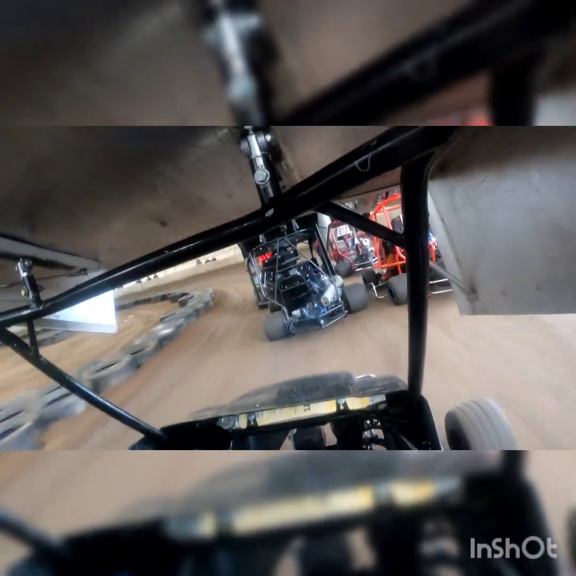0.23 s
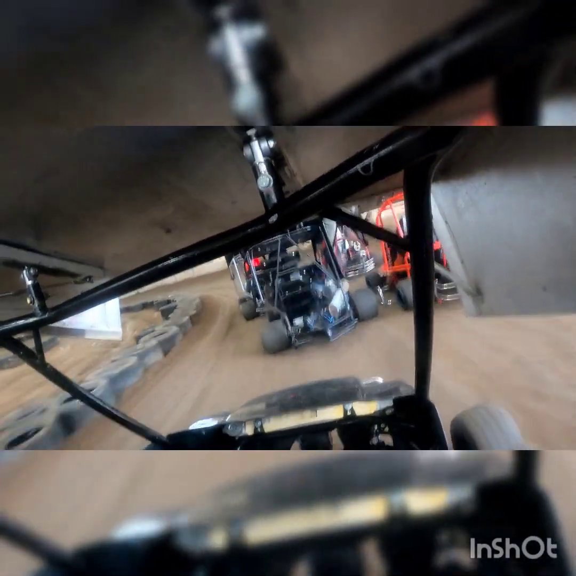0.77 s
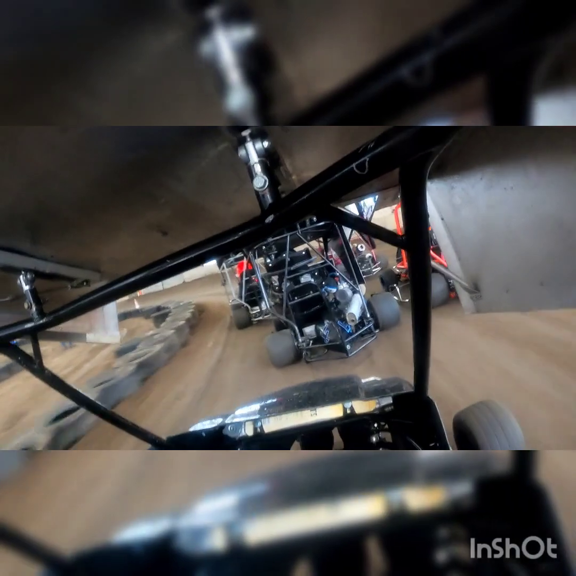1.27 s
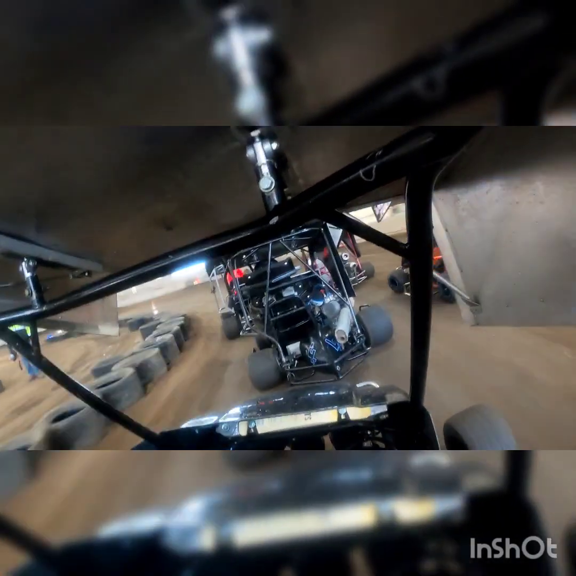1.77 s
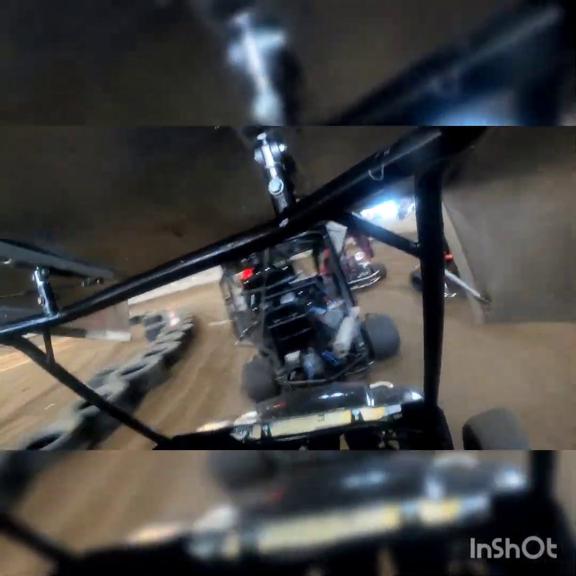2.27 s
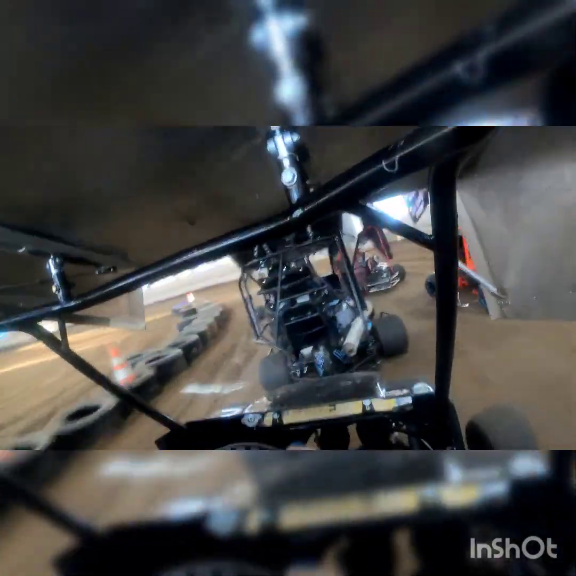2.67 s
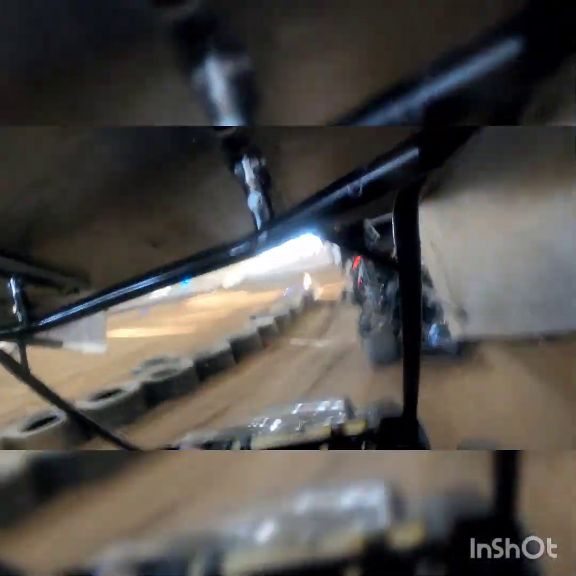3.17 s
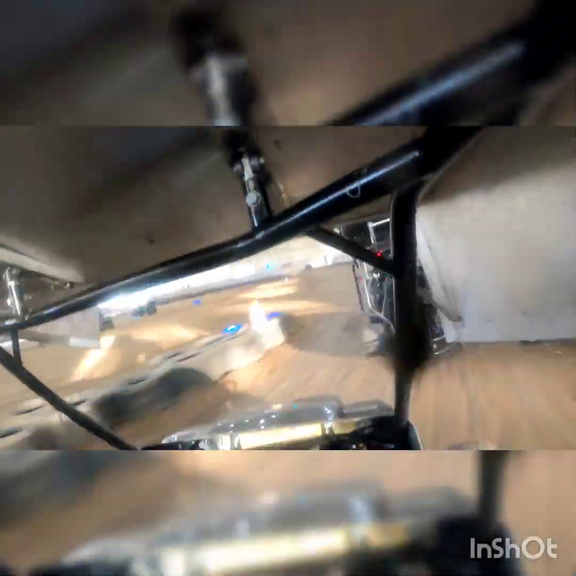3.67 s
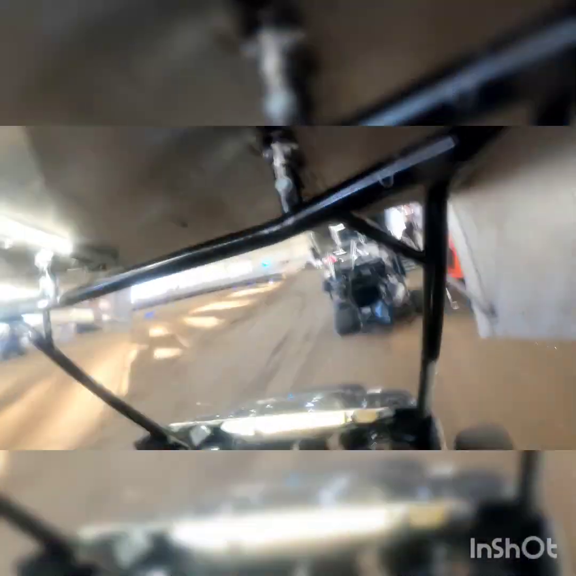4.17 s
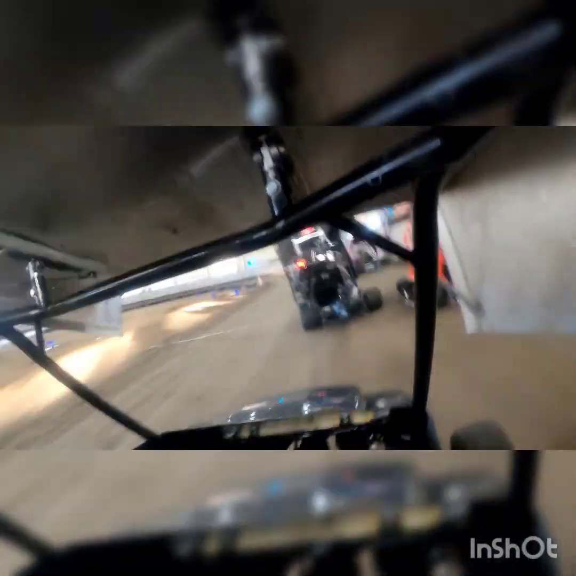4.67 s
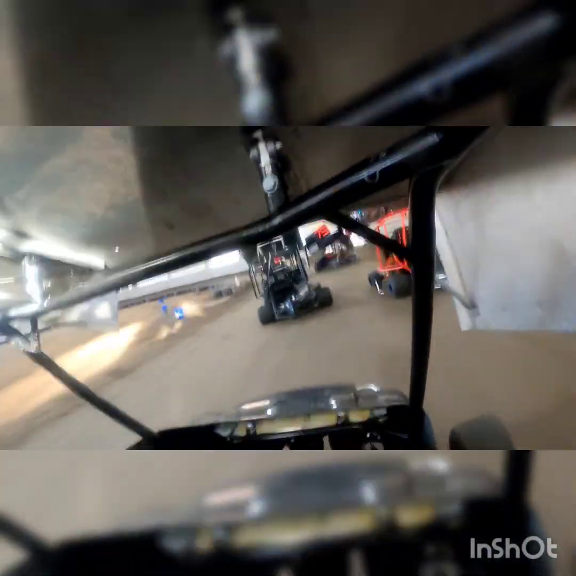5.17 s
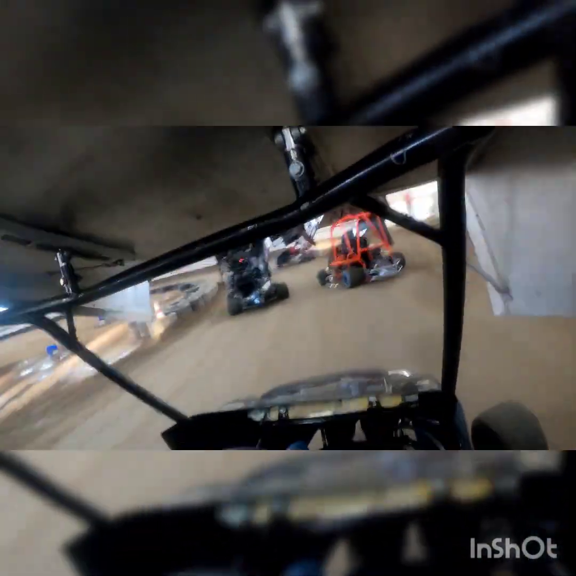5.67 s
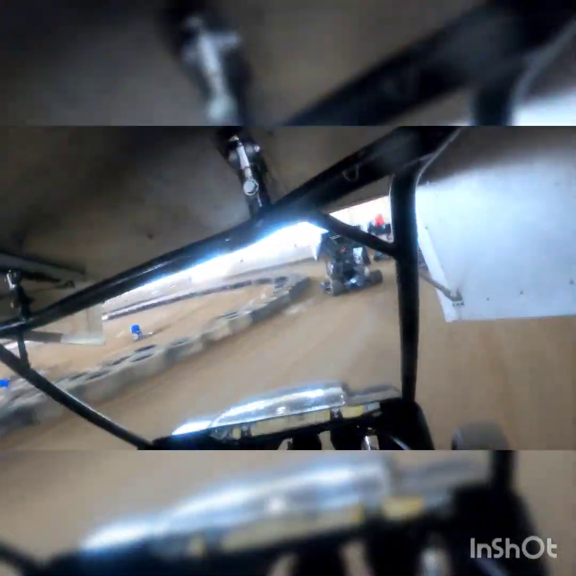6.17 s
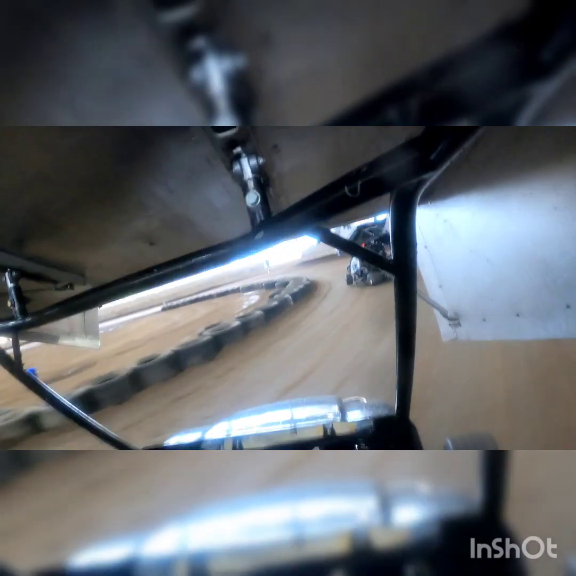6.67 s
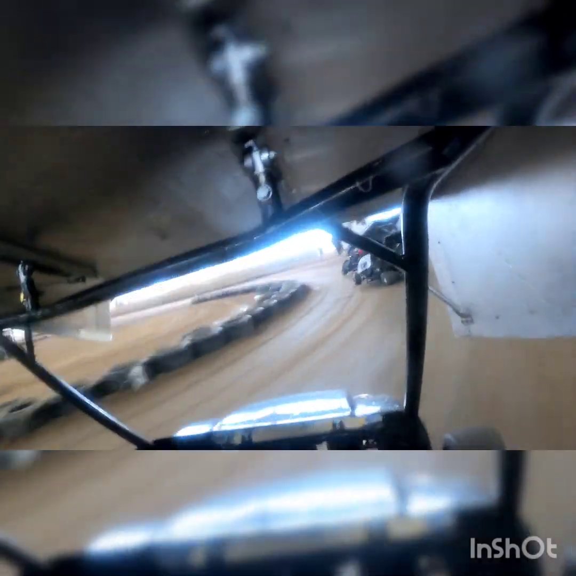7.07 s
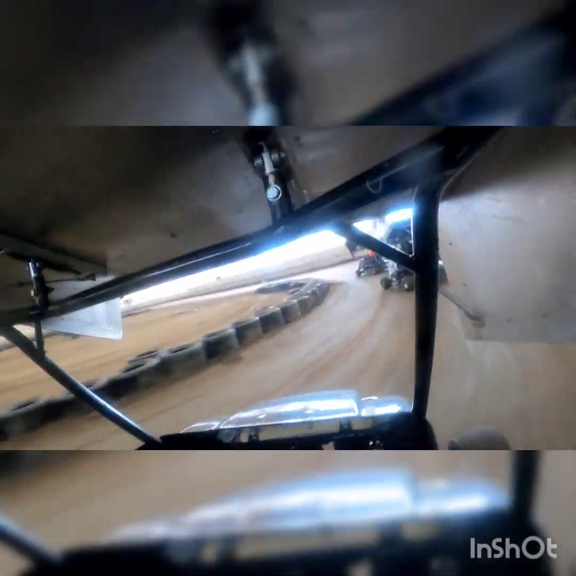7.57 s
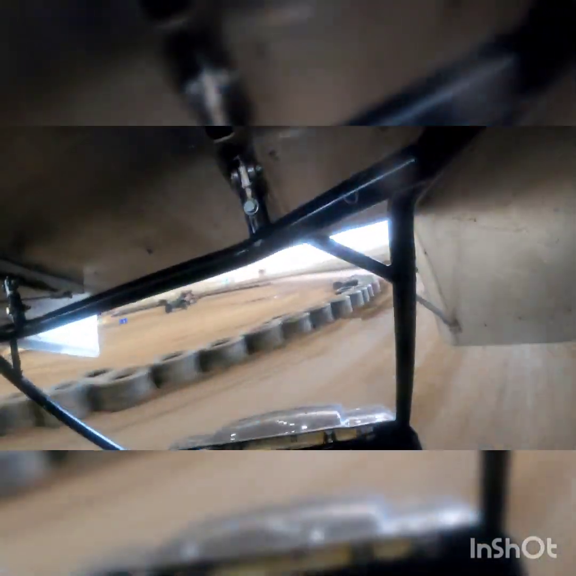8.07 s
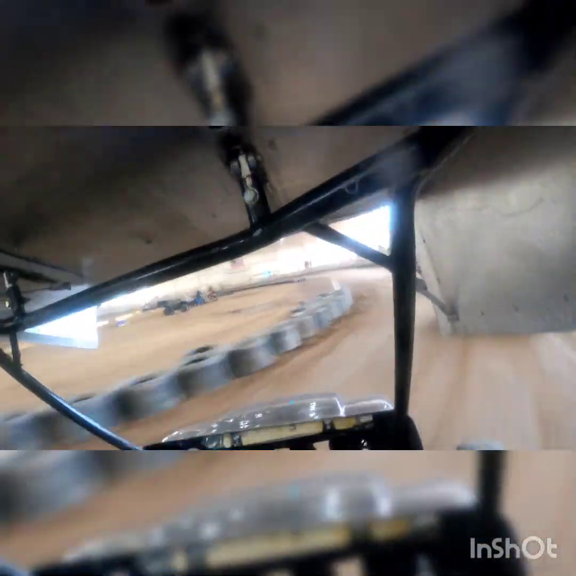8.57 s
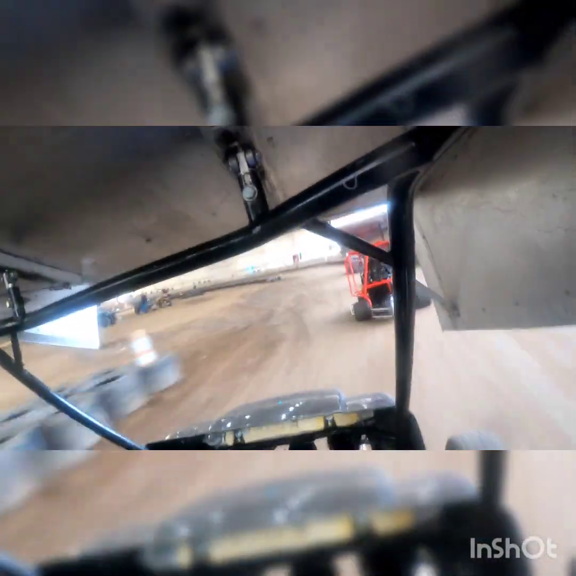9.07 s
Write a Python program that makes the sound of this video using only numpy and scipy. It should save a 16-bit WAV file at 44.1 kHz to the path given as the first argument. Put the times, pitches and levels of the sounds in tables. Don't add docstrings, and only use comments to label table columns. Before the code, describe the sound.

A close, continuous kart roar, coloured by a small camera housing, pulses and trembles with bumps. The engine starts low and uneven with another kart blipping alongside, then pulls harder from about three seconds. Stones tick, cage tubes ring dully, tyres rumble over ruts, and a cluster of slams chokes the sound near six seconds before a stronger, higher finish.

```python
import sys
import numpy as np
from scipy import signal
from scipy.fft import rfft, irfft, next_fast_len
from scipy.io import wavfile
from scipy.ndimage import map_coordinates

SR = 44100
rng = np.random.default_rng(int(sys.argv[2]) if len(sys.argv) > 2 else 0)


def decibels_to_gain(level_db):
    exponent = np.asarray(level_db, float) / 20
    return 10 ** exponent


def master(y):
    cut = np.clip(np.atleast_2d(y).T, -1, 1)
    pcm = np.round(cut * 32767)
    wavfile.write(sys.argv[1], SR, pcm.astype(np.int16))


N = 410998

# (time [s], firing rate [Hz], effort [dB])
THROTTLE = [(0.0, 60, -0.5), (0.75, 85, -2.5), (1.11, 83, -1.5), (1.35, 70, -2), (1.62, 69, -3),
            (1.9, 86, -1), (2.18, 67, -1.5), (2.5, 70, -0.5), (3.03, 92, -1), (3.2, 118, 2.5),
            (4.85, 116, 1), (5.03, 101, 0), (5.5, 99, 0.5), (5.75, 66, 1), (6.22, 110, 1),
            (7.5, 89.24, 1.5), (8.0, 131, 3), (9.32, 143, 2.5)]
# (time [s], rate swing [Hz], first order level [dB], second order level [dB])
BARKS = [(0.02, 0, -21, -18), (0.3, 2, -30, -18.5), (1.11, 1.5, -18.5, -12.5), (1.9, 1, -19, -11),
         (2.661, 7, -25.5, -20.5), (3.06, 1, -15, -13.5), (3.43, -13, -29.5, -18.5), (3.58, 5, -15, -38),
         (3.74, -7, -35, -21.5), (3.84, 4, -20.5, -27), (4.12, 7, -13.5, -35), (4.31, -11, -17, -36),
         (4.571, 2, -17.5, -20.5), (4.88, 1, -19, -27.5), (5.351, -2, -26.5, -16), (5.53, 1, -18.5, -16.5),
         (6.27, 9, -14, -19), (6.44, -4.5, -25.5, -11), (6.57, 5, -12.5, -26), (6.74, -11, -22.5, -15.5),
         (6.94, 28, -14, -23), (7.08, 17, -17.5, -22.5), (7.65, 8, -13, -20.5), (7.79, 11, -14.5, -25.5),
         (8.079, 11, -24, -18), (8.25, -18.5, -21.5, -30), (8.58, 16, -19.5, -18), (8.73, 6.5, -12.5, -38),
         (9.018, 11, -16.5, -20), (9.17, -0.5, -11.5, -35)]
BARK_HALF_S = 0.08


def unit(x):
    return x / np.sqrt(np.mean(x ** 2) + 1e-20)


def along(points, hz):
    f, value = np.transpose(points)
    return np.interp(np.log(hz + 1), np.log(f + 1), value)


def curves(rows):
    s, *columns = np.transpose(rows)
    return [np.interp(np.arange(N) / SR, s, column) for column in columns]


def wobble(rate):
    coarse = np.arange(0, N + 16, 16)
    knots = rng.standard_normal(int(N * rate / SR) + 4)
    return np.interp(np.arange(N), coarse, map_coordinates(knots, [coarse * rate / SR]))


def filtered(x, response):
    m = next_fast_len(N + SR // 2)
    return irfft(rfft(x, m) * response(np.fft.rfftfreq(m, 1 / SR)), m)[..., :N]


def below(x, hz):
    return filtered(x, lambda f: 1 / (1 + (f / np.reshape(hz, (-1, 1, 1))) ** 6))


def tone(hz, db, drift_hz, flutter_db):
    phase = 2 * np.pi * np.cumsum(hz + drift_hz * wobble(25)) / SR
    return np.sqrt(2) * decibels_to_gain(db + flutter_db * wobble(30)) * np.sin(phase)


def humps(s, half_s, size):
    t = np.arange(0, N + 64, 64) / SR
    bells = np.exp(-((t[:, None] - s) / half_s) ** 2) @ (size * np.ones(len(s)))
    return np.interp(np.arange(N) / SR, t, bells)


def swells(s, half_s, db, rest_db):
    return 20 * np.log10(humps(s, half_s, decibels_to_gain(db)) + decibels_to_gain(rest_db))


def rung(rows, rest_db):
    s, half_s, db, hz = np.transpose(rows)
    return np.interp(np.arange(N) / SR, s, hz), swells(s, half_s, db - 3.0, rest_db)


def firing_rate():
    s, swing_hz = np.transpose(BARKS)[:2]
    return curves(THROTTLE)[0] + humps(s, BARK_HALF_S, swing_hz)


def engine():
    pipe_hz, pipe_width_hz, pipe_db = 295, 29.4, -31
    hz = firing_rate()
    s, _, first_db, second_db = np.transpose(BARKS)
    first_db = swells(s, BARK_HALF_S, first_db, rest_db=-25)
    second_db = swells(s, BARK_HALF_S, second_db, rest_db=-28.5)
    exhaust = tone(hz, first_db - 2.5, drift_hz=1.5, flutter_db=1.3)
    exhaust += tone(2 * hz, second_db - 4.5, drift_hz=3.1, flutter_db=1.3)
    for order in (3, 4, 5):
        off = (order * hz - pipe_hz) / pipe_width_hz
        exhaust += tone(order * hz, pipe_db - 10 * np.log10(1 + off ** 4), drift_hz=5, flutter_db=3.5)
    return exhaust


def ports(pair):
    # (frequency [Hz], density [dB per Hz])
    left_duct = [(190, -31), (330, -5), (499, 2.5), (661, -3), (807, -0.5), (1190, 0), (1300, -5.5),
                 (1730, -3.5), (2510, -11.5), (2830, -30.5), (3110, -15), (4000, -26.5), (4630, -18.5),
                 (5510, -17), (8010, -44.5), (10400, -76), (17600, -120)]
    right_duct = [(190, -20), (330, -6.5), (455, -1), (626, -11), (765, 1.5), (874, -8.5), (1170, 0),
                  (1380, -8.5), (1620, -3), (2510, -10.5), (2790, -19), (3060, -17.5), (4060, -21),
                  (4450, -27), (8010, -37.5), (10400, -71), (17600, -120)]
    # (frequency [Hz], width [Hz], lift [dB])
    resonances = [(1177, 65, 1), (1583, 110, 2), (2524, 53, 3.5), (3050, 64, 5), (4390, 120, 10.5),
                  (4700, 80, 5)]
    # (frequency [Hz], correlation [0 to 1])
    likeness = [(250, 1), (390, 1), (500, .74), (640, 0.089), (900, 0.55), (1170, 0.89), (1480, 0.98),
                (1700, 0.9), (2100, 0.68), (2450, .93), (3100, 0.63), (4100, 0.66), (4500, 0.87),
                (5400, 0.56), (6200, .15)]
    # (frequency [Hz], phase [rad])
    left_lead = [(0, -9.5), (520, -1.15), (1030, 0.5), (1460, -0.85), (1980, 0.33), (2410, 1.5),
                 (3450, 0.07), (4570, 3.5), (4910, 4.5), (5600, 4.5), (6290, -3.5), (6890, -1.5),
                 (7150, -14.5), (7750, 2)]

    def response(f):
        turn = np.arccos(np.clip(along(likeness, f), 0, 1)) / 2
        lift_db = sum(db / (1 + ((f - c) / w) ** 2) for c, w, db in resonances)
        left_close_db = 5 / (1 + (5750 / (f + 1)) ** 40)
        right_close_db = 14 / (1 + (8100 / (f + 1)) ** 60)
        lead = np.exp(.5j * along(left_lead, f))
        left = decibels_to_gain(along(left_duct, f) + lift_db - 3.5 - left_close_db) * lead
        right = decibels_to_gain(along(right_duct, f) + lift_db - right_close_db) * np.conj(lead)
        return np.array([[left * np.cos(turn), left * np.sin(turn)],
                         [right * np.cos(turn), -right * np.sin(turn)]])
    return unit(filtered(pair, response).sum(axis=1))


def pack_chains(rattle, pack_db):
    def whine(f):
        peak_db = 0.91 * pack_db / (1 + ((f - 5000) / 450) ** 4)
        dip_db = 1.1 * pack_db / (1 + ((f - 4050) / 250) ** 2)
        return decibels_to_gain(peak_db - dip_db) - 1
    return filtered(rattle, whine)


def roar():
    # (time [s], half length [s], change [dB])
    tin_swells = [
        (0.311, .03, -8),
        (0.836, 0.03, 2.5),
        (1.1, 0.068, 3),
        (1.5, 0.072, 1.5),
        (1.66, 0.046, -3.5),
        (2.604, 0.058, 4.5),
        (6.49, .06, -4),
        (8.24, 0.12, -2),
        (8.636, 0.13, 2.5),
    ]
    # (frequency [Hz], density [dB per Hz])
    air_colour = [(7600, -22), (8500, -1.5), (10300, 0), (12200, -1.5), (13500, -10.5), (15000, -25),
                  (16000, -56.5)]
    pack_full_db, pack_leaves_s, pack_fade_s = 2.5, 3.2, .6

    t = np.arange(N) / SR
    effort_db = curves(THROTTLE)[1]
    tin_db = humps(*np.transpose(tin_swells))
    pack = np.clip((pack_leaves_s - t) / pack_fade_s, 0, 1)
    pack_db = pack_full_db * pack

    level_db = -23 + .1 * effort_db + tin_db
    drone_db = 0.44 - 0.37 * effort_db + 0.23 * pack_db - .9 * tin_db
    bite_db = 0.01 + 1.18 * effort_db - 0.79 * tin_db
    fizz_db = -1.7 + 0.48 * effort_db + pack_db - .8 * tin_db

    firing = np.cos(2 * np.pi * np.cumsum(firing_rate()) / SR)
    grain = decibels_to_gain(0.83 * wobble(80) + 1.02 * wobble(400)) * (1 + 0.14 * firing)
    rattle = ports(grain * rng.standard_normal((2, N)))
    low, middle, upper = below(rattle, hz=[680, 1500, 4100])
    chains = pack * pack_chains(rattle, pack_full_db)

    lurch_db = 0.56 * wobble(9.9) + 0.6 * wobble(22) + 0.98 * wobble(50)
    spit = decibels_to_gain(fizz_db + 0.88 * lurch_db + 0.9 * wobble(11) + 1.2 * wobble(150))
    sound = decibels_to_gain(drone_db + 1.2 * wobble(15)) * low
    sound += decibels_to_gain(0.18 * lurch_db) * (middle - low)
    sound += decibels_to_gain(bite_db + lurch_db + 0.76 * wobble(11)) * (upper - middle)
    sound += spit * (rattle - upper + chains)

    hiss = unit(filtered(rng.standard_normal((2, N)), lambda f: decibels_to_gain(along(air_colour, f))))
    hiss_db = -46.5 + .5 * effort_db - 0.34 * pack_db
    hiss_db += .3 * lurch_db + .8 * wobble(9) + 2.2 * wobble(300)
    return decibels_to_gain(level_db + 4.5) * (sound + decibels_to_gain(hiss_db) * spit * hiss)


def mount():
    # (time [s], half length [s], level [dB], pitch [Hz])
    bumps = [(.06, 0.12, -13, 41.78), (.4, .1, -16, 42.13), (.61, 0.044, -16, 44.5),
             (.85, .2, -16.5, 42.86), (1.4, 0.27, -14.5, 41.05), (1.73, .08, -14.5, 46.1),
             (2.05, 0.22, -20, 46.7), (2.42, 0.26, -18, 43.9), (2.9, 0.085, -12.5, 40.48),
             (3.15, .12, -16, 39.4), (3.5, .25, -19.5, 39), (3.9, 0.059, -16, 40.83),
             (4.13, .1, -17.5, 41.2), (4.55, 0.24, -16.5, 40.56), (4.9, .15, -21, 42.46),
             (5.14, .05, -14, 40.3), (5.3, .1, -16, 42.7), (5.8, 0.19, -15.5, 41.54),
             (6.07, 0.12, -14.5, 40.8), (6.39, 0.051, -12.5, 45.1), (6.82, 0.13, -18, 42.83),
             (7.16, 0.19, -19, 41.3), (7.45, .13, -12, 41.5), (7.9, 0.08, -12, 42.1),
             (8.31, .08, -14.5, 41.7), (8.68, 0.074, -33, 41.9), (8.91, 0.065, -17, 46.6),
             (9.32, 0.091, -22.5, 48.6)]
    return tone(*rung(bumps, rest_db=-38), drift_hz=1.49, flutter_db=-2.3)


def cage():
    # (time [s], half length [s], level [dB], pitch [Hz])
    blows = [(.3, 0.17, -21, 211), (.55, 0.041, -14.5, 212), (.95, .12, -15.5, 215),
             (1.27, 0.14, -19.5, 208), (1.6, 0.042, -14, 212), (2.0, 0.19, -18, 216),
             (2.18, 0.027, -14, 201), (2.4, .08, -20.5, 200), (2.54, 0.12, -23, 212),
             (2.68, 0.093, -11.5, 201), (3.0, .09, -22.5, 213), (3.5, 0.04, -14, 215),
             (3.85, 0.072, -30.5, 222), (4.31, 0.072, -16.5, 211), (4.5, 0.11, -21.5, 205),
             (4.78, 0.13, -20.5, 199), (5.19, 0.035, -10.5, 209), (5.42, 0.13, -19, 209),
             (5.82, 0.052, -18, 197), (6.2, 0.063, -16.5, 196), (6.46, 0.033, -20, 208),
             (6.64, 0.055, -22.5, 218), (7.27, 0.12, -16, 196), (7.62, 0.062, -16, 210),
             (8.17, 0.048, -16, 182), (8.9, 0.073, -22, 200)]
    return tone(*rung(blows, rest_db=-32), drift_hz=6.065, flutter_db=2.0)


def panels():
    # (pitch [Hz], wander [Hz], left level [dB], right level [dB])
    sheets = [(1183, 29.9, -39, -33), (1586, 35, -39.5, -36.5), (1733, 40, -37, -35)]
    return sum(decibels_to_gain([[left_db], [right_db]]) * tone(hz, 0, drift_hz=wander_hz, flutter_db=1.5)
               for hz, wander_hz, left_db, right_db in sheets)


def ticks():
    # (time [s], peak level [dB])
    cracks = [(0.7904, -43), (1.717, -37), (1.7724, -42), (2.2594, -45), (4.100, -32), (4.2921, -35),
              (4.559, -31.5), (4.6224, -35), (4.755, -40), (5.9434, -35), (6.6982, -45), (8.5617, -37)]
    t = np.arange(SR // 50) / SR
    out = np.zeros((2, N + SR))
    for s, db in cracks:
        burst = decibels_to_gain(db + 12 - 60 * t / .012) * rng.standard_normal((2, len(t)))
        out[:, round(s * SR):][:, :len(t)] += burst

    def bright(f):
        body = 1 / (1 + (f / 6500) ** 6)
        sparkle = .06 / (1 + (f / 13000) ** 14)
        return (1 - 1 / (1 + (f / 4000) ** 4)) * (sparkle + body)
    return filtered(out[:, :N], bright)


def choke():
    # (time [s], depth [dB], length [s])
    slams = [
        (0.329, 4.5, 0.007),
        (4.755, 4, 0.003),
        (5.82, 5, 0.009),
        (5.973, 14, 0.0025),
        (5.998, 10, 0.0015),
        (6.022, 6, .002),
        (6.037, 14, 0.0022),
        (6.052, 6, .002),
        (6.061, 14, 0.003),
        (7.438, 3, 0.016),
    ]
    t = np.arange(N) / SR
    return decibels_to_gain(-sum(db * np.exp(-((t - s) / length) ** 2) for s, db, length in slams))


def other_karts():
    # (time [s], half length [s], level [dB], pitch [Hz])
    howl_swells = [
        (.6, 0.073, -32, 497),
        (1.44, .07, -28.5, 470),
        (1.85, .13, -26.5, 450),
        (5.55, 0.17, -27, 530),
        (6.75, .08, -28.5, 500),
    ]
    # (time [s], half length [s], level [dB], firing rate [Hz])
    blips = [
        (.04, 0.092, -16, 50.2),
        (.7, 0.18, -14, 56.55),
        (1.1, 0.22, -21.5, 51),
        (1.48, 0.11, -23.5, 55.3),
        (1.69, 0.055, -16.5, 50.2),
        (2.42, .2, -13.5, 50.5),
    ]
    howl = tone(*rung(howl_swells, rest_db=-50), drift_hz=9, flutter_db=3.5)
    return howl + tone(*rung(blips, rest_db=-46.5), drift_hz=2.5, flutter_db=-2.0)


def ground():
    # (frequency [Hz], density [dB per Hz])
    rumble_colour = [(15, -27.5), (25, -13.5), (48, -7.5), (81, -8.5), (194, -1.5), (276, -6), (380, -22.5),
                     (490, -45.5), (840, -120)]
    # (time [s], half length [s], more thud [dB])
    rutted = [
        (3.208, 0.35, 4),
        (5.702, 0.64, 6),
        (8.3, 0.46, 5.5),
    ]
    t = np.arange(N) / SR
    thud_db = -26 - 0.46 * t + humps(*np.transpose(rutted))
    drum_db = -17 - 0.24 * t + 0.45 * wobble(7.0)
    common, other = filtered(rng.standard_normal((2, N)), lambda f: decibels_to_gain(along(rumble_colour, f)))
    thud = filtered(common, lambda f: 1 / (1 + (f / 90) ** 6))
    rumble = decibels_to_gain(thud_db) * unit(thud) + decibels_to_gain(drum_db) * unit(common - thud)
    stray = decibels_to_gain(-34) * unit(other + 2.5 * thud[::-1])
    return rumble + np.array([stray, -stray])


def scene():
    lean_db = 0.48 + .1 * curves(THROTTLE)[1]
    low = engine() + other_karts() + mount() + cage() + ground()
    low = low * decibels_to_gain(np.outer([-1, 1], lean_db))
    low = filtered(low, lambda f: np.exp(np.outer([-1j, 1j], np.pi * f * 4.5 / SR)))
    return low + choke() * (roar() + panels()) + ticks()


def band_limit(x):
    return signal.sosfilt(signal.butter(12, 15100, fs=SR, output="sos"), x)


def record(dry):
    top = np.array([[.9], [1.02]])
    soft = dry / (1 + np.abs(dry / top) ** 4) ** (1 / 4)
    soft = soft * np.clip((N - np.arange(N)) / (SR // 200), 0, 1)
    return band_limit(soft)


dry = scene()
out = record(dry)
master(out)
```